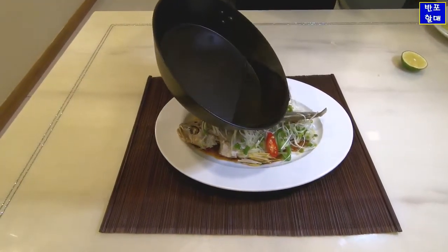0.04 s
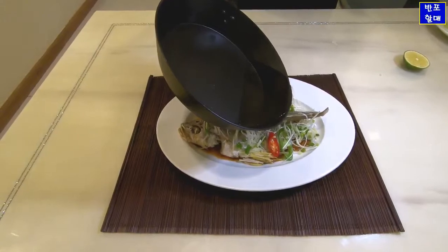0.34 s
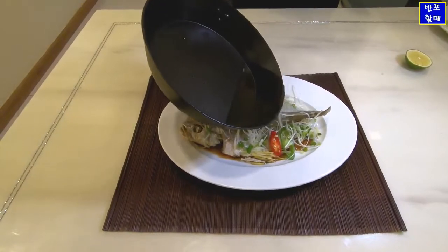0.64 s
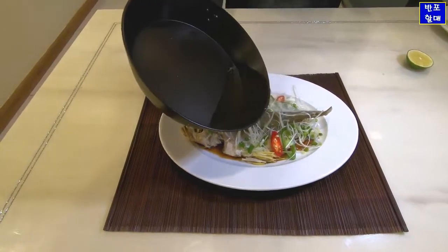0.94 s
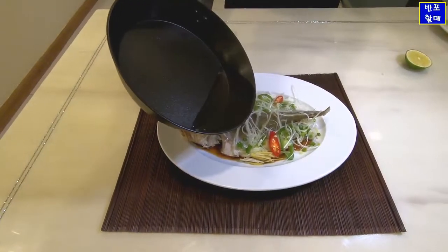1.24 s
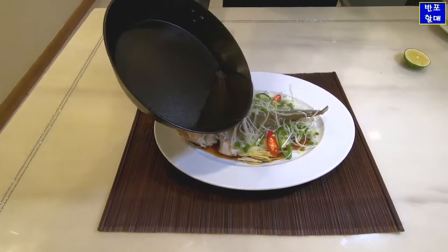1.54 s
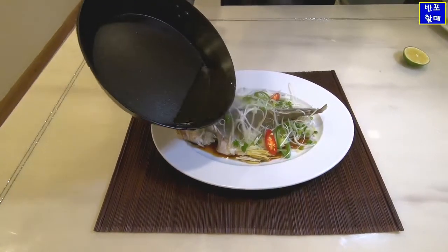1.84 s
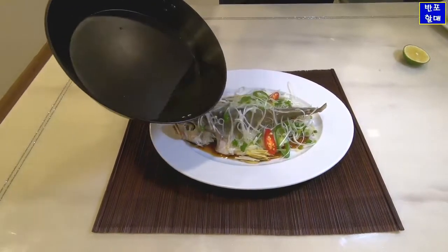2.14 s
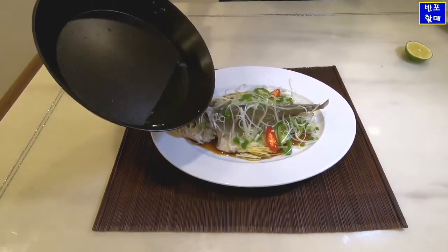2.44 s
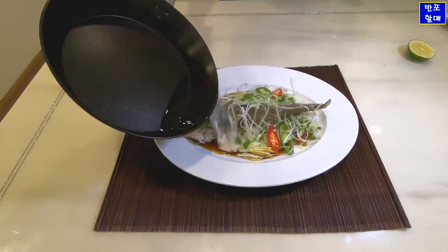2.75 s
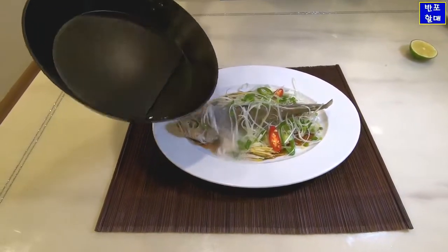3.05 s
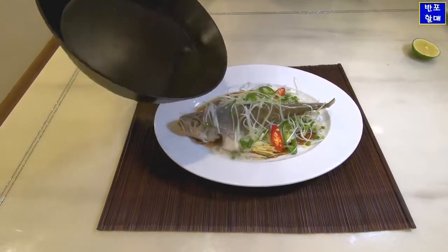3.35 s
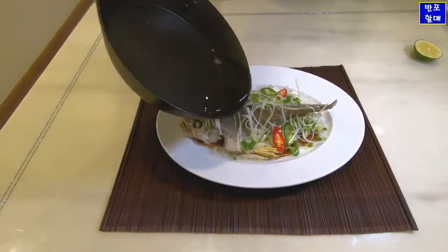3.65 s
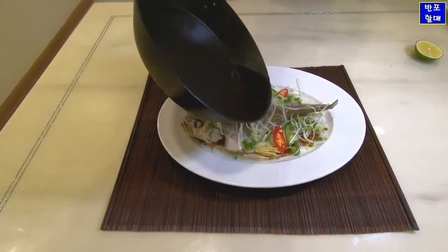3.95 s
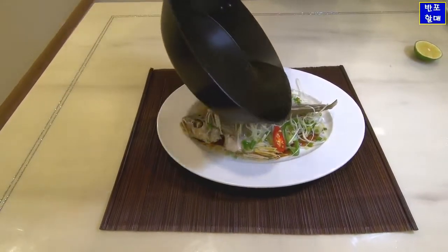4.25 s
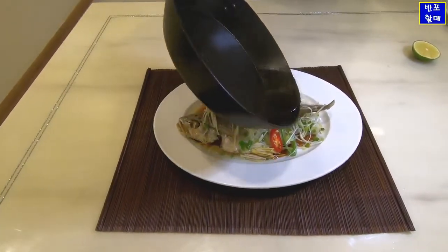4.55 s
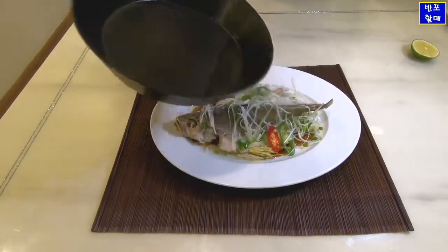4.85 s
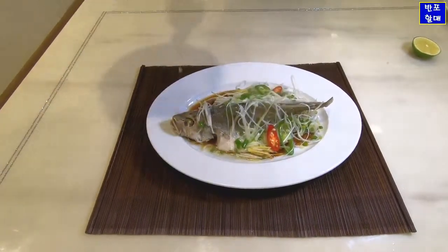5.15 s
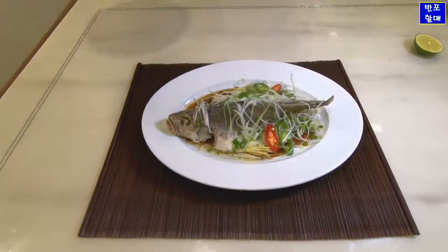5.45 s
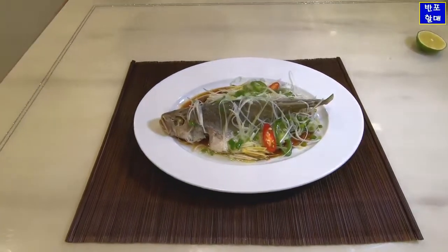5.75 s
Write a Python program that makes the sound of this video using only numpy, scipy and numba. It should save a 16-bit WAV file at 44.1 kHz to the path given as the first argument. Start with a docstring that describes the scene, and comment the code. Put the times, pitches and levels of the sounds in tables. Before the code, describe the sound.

Hot oil is poured from a pan over steamed fish and onion on a plate. A bright, fizzing sizzle surges in several gushes, each thinning to a crackle, while single drops spit with sharp pops. It drops away briefly midway, surges again, then dies down to scattered ticks. The microphone is close, in a small kitchen with a faint low hum.

```python
"""A bright sizzle surges in gushes, sputtering and spitting: hot oil poured over steamed fish and onion.
Water flashes to steam under the oil: thousands of tiny bubbles burst each second, some in quick runs,
and single drops spit loudly. The plate rings a little and the pan above it throws the sound back.
Behind it are a small kitchen, a low swelling hum and a soft rush as the pan is taken away.
The microphone is close, and its limiter ducks after the loudest spits."""
import sys
import numpy as np
from scipy import signal
from scipy.fft import rfft, irfft, next_fast_len
from scipy.io import wavfile
from numba import njit

SR = 44100
rng = np.random.default_rng(int(sys.argv[2]) if len(sys.argv) > 2 else 0)


def int16_out(signal):
    """Quantize to a 16-bit WAV file."""
    q = np.round(np.clip(np.atleast_2d(signal).T, -1, 1) * 32767)
    wavfile.write(sys.argv[1], SR, q.astype(np.int16))


N = 260454
TIME = np.arange(N) / SR
POP_TIME = np.arange(-128, 896) / SR  # from just before a pop's peak to just after [s]


def boil(soak_db=-9.5, soak_s=.081, flash_db=1, flash_s=.04,
         thinning_s=.14, crackle_per_s=310, sag_octaves_per_s=.32):
    """Gushes swell, hold and fade. Gives strength, coarse bubbling and fizz in dB, bubble pitch and rate."""
    # gushes of oil: (start [s], rise [s], hold [s], level [dB], fade [dB/s], coarse bubbling [dB],
    # fine fizz [dB], bubble pitch [Hz], rate of 3 kHz bubbles [1/s])
    gushes = [(0.26, 0.037, 0.091, -33, 37, 4.5, 5.5, 4100, 2110),
              (0.40, .14, 0.23, -24, 28, 1.5, 2, 4230, 1800),
              (1.05, 0.23, 0.21, -31.5, 23, 2.5, 8.5, 3700, 527),
              (1.616, 0.086, .13, -23.5, 40, 0.5, 2.5, 3700, 520),
              (1.985, 0.083, 0.093, -36, 30, -1.5, 0.5, 2460, 384),
              (2.429, 0.023, 0.065, -44, 43, 7, 11.5, 4210, 640),
              (2.73, 0.068, .10, -21.5, 46, -1, 1.5, 3898, 1900),
              (2.94, 0.087, .07, -28, 36, 1.5, 3, 3372, 725),
              (3.353, 0.036, 0.32, -40, 27, -1, 6, 4242, 405),
              (3.779, 0.036, 0.057, -32, 30, 9.5, 7, 2950, 1020),
              (3.858, .11, 0.11, -23, 42, -2, 0, 2937, 1540), (4.249, .21, 0.25, -27, 27, 3, 0, 3350, 1990),
              (4.66, 0.17, 0.14, -29.5, 33.5, 1, 6.5, 3446, 820)]
    # the oil simmers faintly in the pan all along
    simmer_db, simmer_coarse_db, simmer_hz, simmer_per_s = -63.5, -12, 3600, 25
    simmer = np.array([1, undb(2 * simmer_coarse_db), 1, simmer_hz, simmer_per_s])
    total = undb(2 * simmer_db) * simmer[:, None]
    for start, rise, hold, db, fade, coarse_db, fizz_db, hz, per_s in gushes:
        age = np.maximum(TIME - start, 0)
        cooling = np.maximum(age - rise - hold, 0)
        swell = np.sin(np.pi / 2 * np.minimum(age / rise, 1))
        power = (swell * undb(db - fade * cooling)) ** 2
        # the first touch flashes into fizz; coarse bubbling builds as oil sinks into the sauce
        fizz = undb(fizz_db + flash_db * np.exp(-age / flash_s)) ** 2
        coarse = undb(coarse_db + soak_db * np.exp(-age / soak_s)) ** 2
        # as the oil cools, the boil drops in pitch and thins to a crackle
        pitch = hz * 2 ** (-sag_octaves_per_s * age)
        rate = crackle_per_s + (per_s - crackle_per_s) * np.exp(-cooling / thinning_s)
        total = total + np.array([power, power * coarse, power * fizz, power * pitch, power * rate])
    levels_db = 10 * np.log10(total[:3])
    pitch, rate = total[3:] / total[0]  # the strongest gush dominates
    return (*levels_db, pitch, rate)


def sizzle(state, favour_db=8, usual_hz=3300, flutter_db=1.0):
    """Bubbles of all sizes burst: wet sauce makes coarse ones, fresh oil fine ones."""
    # tone of the sizzle: (frequency [Hz], relative level [dB])
    tone = [(100, -3), (160, -13.5), (220, -8.5), (330, -13.5), (500, -8), (850, -11.5), (1300, -8),
            (1950, -2), (2700, 1.5), (4700, -3.5), (7200, -7.5), (9400, -11), (11000, -15.5), (13500, -21),
            (15500, -34)]
    strength, coarse, fizz, pitch, rate = state
    rate = np.maximum(rate, 20)
    flutter = flutter_db * walk(45)
    out, power = 0, 0
    for hz in np.geomspace(150, 14500, num=18):
        low = np.clip(np.log2(2300 / hz) / .16, 0, 1)
        high = np.clip(np.log2(hz / 4300), 0, 1)
        db = strength + low * (coarse - strength) + high * (fizz - strength) + flutter
        # each gush meets other food and favours another bubble size
        db = db + favour_db * (hump(hz, pitch, octaves=.63) - hump(hz, usual_hz, octaves=.65))
        per_s = rate * (hz / 3000) ** .3  # small bubbles are more numerous
        grains = bubbles(hz, per_s, cycles=1.33, scatter_db=.5, spread_s=.000024)
        out = out + np.sqrt(hz) * undb(db) * grains
        power = power + hz * undb(2 * spectrum_db(tone, hz))
    return colour(out, tone) / np.sqrt(power)


def bubbles(hz, rate, cycles, scatter_db, spread_s):
    """Bubbles of one size burst at random, each at its own place on the plate."""
    at = np.flatnonzero(rng.random(N) < rate / SR)
    gain = undb(scatter_db * np.minimum(rng.exponential(size=len(at)), 5))
    gain = gain * rng.choice([-1, 1], len(at)) / np.sqrt(rate[at])
    lag = np.rint(spread_s * SR * rng.standard_normal(len(at))).astype(int)  # between left and right
    clicks = [np.bincount(np.clip(at + shift, 0, N - 1), gain, N) for shift in (lag // 2, lag // 2 - lag)]
    return unit(np.array([ring(channel, burst(hz, cycles)) for channel in clicks]))


def burst(hz, cycles):
    """A bursting bubble: a few pressure swings that swell at once and die away."""
    t = np.arange(2048) / SR
    age = t * hz / (.5 * cycles)
    phase = np.pi - 2 * np.arctan(np.pi * cycles)
    return age * np.exp(1 - age) * np.sin(2 * np.pi * hz * t + phase)


def spits(level_db=-1.15, splash_db=-18, splash_s=.0036, splash_hz=6000,
          thud_db=-23, crack_db=-17, crack_hz=8000):
    """A trapped drop explodes: a sharp crack, a round pop, a thud in the food and a brief splash."""
    # the loudest spitting drops: (time [s], relative level [dB], pitch [Hz], decay [cycles])
    drops = [(.058, -31.5, 3850, 0.53), (.089, -38, 4200, .6), (0.2844, -16, 4900, 0.83),
             (0.3268, -23.5, 1090, 0.33), (.6274, -11, 2800, .9), (.7022, -14, 3340, 0.78),
             (.7284, -9.5, 2433, 0.83), (0.7445, -9.5, 2260, 0.44), (.7866, -4.5, 3815, 1.3),
             (0.7931, -6, 2940, 1), (.8812, -9, 4207, 1.1), (.9345, -13, 3200, 0.59),
             (.9925, -14.5, 2310, 0.89), (1.008, -16, 3360, 0.82), (1.0526, -11.5, 3798, 1.3),
             (1.1453, -12.5, 3606, 0.97), (1.2169, -8.5, 1920, 0.73), (1.2825, -7.5, 3290, 1.1),
             (1.3022, -5.5, 3000, 0.59), (1.3321, -9, 2810, 0.56), (1.3359, -6.5, 5247, 0.72),
             (1.3806, -8.5, 3850, 1.6), (1.4071, -2, 4550, 0.69), (1.4431, -13.5, 2880, .7),
             (1.4928, -22, 4415, .7), (1.5816, -13, 4520, 0.67), (1.6317, -4, 3060, 0.83),
             (1.6704, -8, 4347, 1.73), (1.7355, -4.5, 4408, 0.79), (1.7455, -6, 4186, 0.79),
             (1.7597, -5.5, 4064, 1.3), (1.7793, -11, 4000, 0.86), (1.8177, -5, 3640, 0.9),
             (1.8588, -11, 3162, 1.1), (1.8746, -16, 4600, 0.71), (1.8789, -6.5, 4370, 0.64),
             (1.9197, -2.5, 3200, 1.18), (1.9454, -19, 3774, .7), (1.9608, -8, 3554, 1.6),
             (1.9852, -8.5, 2900, 1.6), (1.9884, -5.5, 3540, 1.4), (2.0185, -4.5, 2660, 1.1),
             (2.0273, -11, 3090, 1), (2.0727, -11, 3940, 0.65), (2.0885, -9, 3396, 1.2),
             (2.1074, -6, 2620, 0.85), (2.1654, -10, 3970, 0.57), (2.2326, -25, 3504, 0.81),
             (2.29, -24, 3190, .8), (2.3028, -24, 3395, 0.62), (2.3408, -23.5, 3380, 0.59),
             (2.7451, -26, 4520, 1.3), (2.8545, -5, 3798, 0.96), (2.8917, -3.5, 3640, 1),
             (2.9098, -4.5, 4506, 2.4), (2.958, -7, 3280, 1.3), (2.964, -7, 3530, 1.47),
             (2.9685, -5.5, 3400, 1.3), (2.983, -8, 3070, 1.8), (3.0318, -9, 3664, 0.52),
             (3.0944, -8.5, 3268, 0.59), (3.1407, -6, 3298, 1.7), (3.1725, -3.5, 3696, 1.7),
             (3.219, -14, 3798, 1.47), (3.2278, -9.5, 4120, 0.98), (3.2484, -9.5, 3100, 0.5),
             (3.2685, -11.5, 3296, 0.63), (3.3205, -19.5, 3576, 0.79), (3.3851, -15, 3600, 0.82),
             (3.5019, -11, 3904, 0.87), (3.5183, -14, 3180, 0.75), (3.5262, -13.5, 4300, 0.9),
             (3.6757, -13, 4180, 5.5), (3.685, -20.5, 3283, 4), (3.6946, -23, 4214, 2.2),
             (3.8498, -3.5, 2642, 0.77), (3.9188, -7.5, 2196, 0.69), (4.052, -13, 2712, 1.04),
             (4.065, -6, 2512, 0.82), (4.077, -11, 2384, 0.96), (4.1094, -1.5, 2496, 0.55),
             (4.1661, -6.5, 2898, 1.34), (4.186, -9, 2711, 1.65), (4.1991, -6, 2498, 1.1),
             (4.2259, -5.5, 3252, 0.95), (4.2295, -1.5, 2591, 0.97), (4.2803, -12.5, 2993, 1),
             (4.3441, -4, 3406, 0.59), (4.4036, -10.5, 3292, 0.82), (4.4563, -6.5, 4125, 0.76),
             (4.7156, -6, 2700, 0.75), (4.7268, -6.5, 1920, 0.81), (4.7659, -5.5, 2716, 0.56),
             (4.7826, -8, 2180, 1.05), (4.8367, -9, 2350, 0.63), (4.8527, -5.5, 3686, 0.57),
             (5.0017, -11, 2871, 0.79), (5.017, -15.5, 3462, 1.03), (5.0846, -18, 2903, 0.49),
             (5.116, -13.5, 2614, 0.59), (5.169, -31, 3843, 0.58), (5.2086, -8.5, 3022, 0.39),
             (5.211, -14.5, 1221, 0.51), (5.236, -23, 1289, 0.48), (5.2922, -15.5, 2388, 0.84),
             (5.392, -17, 3008, 0.73), (5.4422, -17.5, 3857, 0.59), (5.5181, -15.5, 3910, 0.67),
             (5.795, -17, 3270, 0.41)]
    out = np.zeros(N)
    dull = signal.butter(2, splash_hz, fs=SR, output="sos")
    spray = undb(splash_db) * (POP_TIME > 0) * np.exp(-np.abs(POP_TIME) / splash_s)
    crack = undb(crack_db) * pop(crack_hz, cycles=.36)
    for s, db, hz, cycles in drops:
        splash = signal.sosfilt(dull, spray * rng.standard_normal(len(spray)))
        thud = undb(thud_db) * pop(hz / 4, cycles=.3)
        add(out, s, undb(db + level_db) * (crack + pop(hz, cycles) + splash + thud))
    return out


def sputter(state, above_db=6, scatter_db=2.5, ceiling_db=-17.5, low_hz=2900, high_hz=11000,
            gap_s=.0032, tilt_db_per_octave=-6, runs=340, pops_per_run=4):
    """One bursting bubble sets off its neighbours: short, uneven runs of crackles, each at its own spot."""
    strength, _, fizz, _, _ = state
    out = np.zeros((2, N))
    for when, loudness, place, *draws in rng.random((runs, 3 + 3 * pops_per_run)):
        at = int(when * (N - 1))
        db = (strength[at] + fizz[at]) / 2 + above_db - scatter_db * np.log(1 - loudness)
        balance = np.sqrt(2 * np.array([[.25 + place / 2], [.75 - place / 2]]))
        s = at / SR
        for wait, pitch, share in np.reshape(draws, (pops_per_run, 3)):
            s = s - gap_s * np.log(1 - wait)
            hz = low_hz * (high_hz / low_hz) ** pitch
            gain = undb(min(db, ceiling_db) + tilt_db_per_octave * np.log2(hz / low_hz)) * (.5 + share)
            add(out, s, balance * gain * pop(hz, cycles=1.38))
    return out


def snaps(level_db=-1):
    """The smallest droplets flash to steam with a thin, high snap."""
    # tiny droplets: (time [s], relative level [dB], pitch [Hz], decay [cycles])
    droplets = [(.2859, -15, 7060, 4), (.8658, -16, 9990, 1.24), (0.9043, -7, 10400, 1.4),
                (1.0522, -14, 8900, 3), (1.063, -14, 8000, 3), (1.4068, -5.5, 9700, 1.6),
                (1.417, -9, 7540, 3), (1.582, -21.5, 9600, 1.2), (1.8095, -7, 9000, 1),
                (1.8155, -8, 9600, 0.95), (1.8746, -8, 9000, 1), (1.879, -13, 8000, 1.5),
                (1.9558, -18, 7500, 2), (1.9606, -12, 7500, 2), (2.0889, -21, 9494, .8),
                (2.1657, -15, 8000, 1.3), (2.3413, -25, 7500, 2), (2.3727, -21.5, 7500, 5.9),
                (2.7695, -29, 6907, 2.91), (2.8856, -6, 9900, 1.35), (2.9554, -9, 9600, 1.4),
                (3.0317, -10, 10480, 2.2), (3.052, -15.5, 10000, 2), (3.2278, -17, 8000, 2),
                (3.393, -20, 7976, 1.93), (3.4723, -24, 8000, 2.2), (3.5263, -16, 10030, 1.2),
                (4.1999, -13, 10010, 1.2), (4.2267, -15, 9980, 0.76), (4.8295, -13, 9490, 1.19),
                (5.0844, -13, 7205, 2.63), (5.1154, -20, 9486, 1.03), (5.4138, -26, 9050, 1.2),
                (5.4426, -23, 8020, 2.1), (5.518, -25, 7900, 1.96), (5.795, -29, 8020, 1.9)]
    out = np.zeros(N)
    for s, db, hz, cycles in droplets:
        add(out, s, undb(db + level_db) * pop(hz, cycles))
    return out


def pop(hz, cycles, swell_cycles=.17):
    """A drop's pressure swings: they build within a cycle, peak near time 0 and die away."""
    turns = hz * POP_TIME
    envelope = np.exp(-np.logaddexp(-turns / swell_cycles, turns / cycles))
    return envelope / envelope.max() * np.cos(2 * np.pi * turns)


def dish(x, direct_db=-2, hollow_loss=.093, echo_s=.0038, echo_db=-15):
    """The plate rings a little; the pan above it forms a hollow and throws the sound back."""
    # resonances of the plate and its food: (frequency [Hz], width [Hz], gain [dB])
    plate_modes = [(540, 91, -38), (912, 10, 4.5), (1184, 120, -2), (1586, 190, -1), (3390, 2920, -10),
                   (4800, 370, -12), (9200, 650, -3)]
    # resonances of the hollow under the pan: (frequency [Hz], width [Hz], gain [dB])
    hollow_modes = [(2403, 166, -0.5), (2834, 57, -1), (4040, 160, -14), (4380, 270, -5)]
    # bands that the pan's reflection cancels: (frequency [Hz], width [Hz], cancelling gain [dB])
    hollow_dips = [(1760, 290, -11.5), (3180, 210, -12.5), (5600, 330, -26)]
    # how closely the pan covers the boil and how its tilt retunes the hollow:
    # (time [s], cover [dB], tuning [ratio])
    pan_moves = [(0.3, 0, 1.03), (.6, 2.5, 1.006), (.8, -5, 0.97), (1.2, 1.5, 1.04), (1.8, -0.5, 0.98),
                 (2.3, -22, 0.95), (2.8, -14, 1.22), (3.5, -14, 1.053), (3.82, 1.5, 1.017),
                 (4.05, -7, 1.006), (4.35, -1, 1.07), (4.8, -23, 1.023), (5.2, -29.5, 0.76)]
    cover_db, tuning = curves(pan_moves)
    cover = undb(cover_db)
    plate = undb(direct_db) * x + resonate(x, plate_modes)
    hollow = resonate(x, hollow_modes, tuning) - resonate(x, hollow_dips, tuning)
    dulled = signal.sosfilt(signal.butter(1, 2500, fs=SR, output="sos"), x)
    echo = np.pad(dulled, ((0, 0), (int(echo_s * SR), 0)))[:, :N]
    return (plate + cover * hollow) / (1 + hollow_loss * cover) + undb(echo_db) * echo


def room(x, early_db=-13, early_t60=.088, late_db=-13, late_t60=.71, spots=3):
    """Quick dull reflections off the table, then the kitchen's short tail, different left and right."""
    # reflections favour the low middle and the treble: (frequency [Hz], gain [dB])
    tone = [(200, -1), (700, 5), (1300, 6), (2500, -2), (4500, 4), (8000, 9), (14000, 0)]
    dull = signal.butter(1, [500, 1800], "band", fs=SR, output="sos")
    # the boil hops between spots on the plate, each with its own reflections
    shares = np.array([walk(70) for _ in range(spots)])
    shares = shares / np.linalg.norm(shares, axis=0)
    out = np.zeros((2, N))
    for channel in range(2):
        for share in shares:
            early = undb(early_db) * signal.sosfilt(dull, tail(early_t60))
            late = undb(late_db) * tail(late_t60)
            out[channel] += ring(x[channel] * share, early + late)
    return colour(out, tone)


def tail(t60):
    """A scatter of reflections that falls 60 dB per t60 seconds; energy 1."""
    t = np.arange(SR // 3) / SR
    response = rng.standard_normal(len(t)) * undb(-60 * t / t60) * (t > .0005)
    return response / np.linalg.norm(response)


def rush():
    """A soft midrange rush as the pan is taken away."""
    # swell of the rush: (time [s], level [dB])
    swell = [(5.6, -64), (5.66, -44), (5.72, -41), (5.77, -41), (5.82, -45), (5.88, -50)]
    # tone of the rush: (frequency [Hz], relative level [dB])
    tone = [(100, -6), (500, -3.5), (1500, 0), (2700, 3), (4000, -4), (10000, -16), (14000, -42)]
    db, = curves(swell)
    gate = TIME > swell[0][0]
    return gate * undb(db) * stereo_noise(tone, side_db=-8)


def hum(hz=39.8, wander_hz=1.54, rumble_db=-16, waver_db=2.5):
    """A very low hum swells and wavers, and a soft rumble swells with it."""
    # swells of the hum: (time [s], level [dB])
    swells = [(0.0, -40), (.2, -40), (0.4, -33.5), (.65, -38), (0.79, -53), (1.1, -50.5), (1.73, -38),
              (2.28, -56), (2.5, -39), (2.68, -69), (2.81, -64), (2.94, -71), (3.45, -57.5), (3.79, -39.5),
              (4.3, -51), (4.47, -40), (4.88, -52), (5.32, -47), (5.39, -67), (5.44, -41.5), (5.56, -35.5),
              (5.63, -52), (5.7, -38), (5.8, -35), (5.86, -56)]
    # tone of the rumble: (frequency [Hz], relative level [dB])
    tone = [(20, -33), (60, -6), (140, -3.5), (250, -14.5), (600, -50), (3000, -90)]
    db = curves(swells)[0] + waver_db * walk(16)
    phase = 2 * np.pi * np.cumsum(hz + wander_hz * walk(22)) / SR
    rumble = unit(colour(rng.standard_normal(N), tone))
    return undb(db) * (np.sqrt(2) * np.sin(phase) + undb(rumble_db) * rumble)


def kitchen(level_db=-50):
    """Steady rumble of the kitchen, nearly alike left and right."""
    # room tone: (frequency [Hz], relative level [dB])
    tone = [(20, -0.5), (30, -17), (55, 4.5), (100, -8), (160, -4.5), (250, -14.5), (440, -20.5),
            (660, -18.5), (1000, -23.5), (2000, -30), (3500, -26.5), (9000, -32), (14000, -43)]
    return undb(level_db) * stereo_noise(tone, side_db=-10)


def limiter(x, threshold_db=-7.5, slope=.86, recovery_db_per_s=40, attack_s=.0027):
    """A loud spit slips through and pushes the gain down; it then creeps back."""
    peak_db = 20 * np.log10(np.abs(x).max(axis=0) + 1e-9)
    over = slope * np.maximum(peak_db - threshold_db, 0)
    recovery = recovery_db_per_s * TIME
    cut_db = np.maximum.accumulate(over + recovery) - recovery
    pole = np.exp(-1 / (attack_s * SR))
    return x * undb(-signal.lfilter([1 - pole], [1, -pole], cut_db))


def undb(db):
    """Decibels to gain."""
    return np.exp(np.asarray(db) * (np.log(10) / 20))


def unit(x):
    """Scale to rms 1."""
    return x / np.sqrt(np.mean(x ** 2))


def curves(table):
    """Each column of a table, joined by straight lines in time."""
    s, *columns = np.transpose(table)
    return [np.interp(TIME, s, column) for column in columns]


def walk(rate):
    """Smooth random wander with a spread near 1."""
    steps = rng.standard_normal(int(N / SR * rate) + 2)
    return np.interp(TIME * rate, np.arange(len(steps)), steps)


def hump(hz, centre_hz, octaves):
    """Bell curve on a pitch axis, 1 at the centre."""
    return np.exp(-.5 * (np.log2(hz / centre_hz) / octaves) ** 2)


def spectrum_db(points, hz):
    """Read (frequency [Hz], level [dB]) points on a log-frequency axis."""
    point_hz, db = np.transpose(points)
    return np.interp(np.log(hz + 1), np.log(point_hz), db)


def colour(x, points):
    """Equalise along a smooth (frequency [Hz], gain [dB]) curve."""
    size = next_fast_len(N + 2048, real=True)
    gain = undb(spectrum_db(points, np.fft.rfftfreq(size, 1 / SR)))
    return irfft(rfft(x, size) * gain, size)[..., :N]


def stereo_noise(tone, side_db):
    """Coloured noise whose side level sets its width."""
    mid, side = unit(colour(rng.standard_normal((2, N)), tone))
    return mid + undb(side_db) * side * np.array([[1], [-1]])


def ring(x, response):
    """Play x through an impulse response."""
    return signal.oaconvolve(x, response)[:N]


def resonate(x, modes, tuning=1):
    """What a set of resonances adds to x; tuning shifts them all."""
    shift = tuning * np.ones(N)
    return sum(undb(db) * np.array([bandpass(channel, hz * shift, float(width)) for channel in x])
               for hz, width, db in modes)


@njit
def bandpass(x, hz, width):
    """One resonance whose centre may move; gain 1 at the centre."""
    out, band_state, low_state = np.empty(len(x)), 0., 0.
    for i in range(len(x)):
        step, damping = np.tan(np.pi * hz[i] / SR), width / hz[i]
        band = (band_state + step * (x[i] + 1e-18 - low_state)) / (1 + step * (step + damping))
        band_state = 2 * band - band_state
        low_state += 2 * step * band
        out[i] = damping * band
    return out


def add(track, s, sound):
    """Mix a pop into the track, its peak at s seconds."""
    i = int((s + POP_TIME[0]) * SR)
    if 0 <= i < N - len(POP_TIME):
        track[..., i:i + len(POP_TIME)] += sound


def scene():
    """Sizzle, sputter and spits on the plate, in the kitchen."""
    state = boil()
    oil = dish(sizzle(state) + sputter(state) + spits() + snaps())
    return oil + room(oil) + rush() + hum() + kitchen()


def record(dry, top_hz=15500):
    """Each microphone port has its own colour; a limiter ducks after loud spits; the top is cut."""
    # balance of the two ports: (frequency [Hz], left minus right [dB])
    balance = [(400, -0.5), (700, 0.5), (1300, -2), (2400, -0.5), (3500, -1), (4800, 2.5), (6500, -3.5),
               (8000, 2), (9400, -4), (12000, 0)]
    left = colour(dry[0], [(hz, db / 2) for hz, db in balance])
    right = colour(dry[1], [(hz, -db / 2) for hz, db in balance])
    limited = np.clip(limiter(np.array([left, right])), -1, 1)
    return signal.sosfilt(signal.ellip(8, .2, 70, top_hz, fs=SR, output="sos"), limited)


dry = scene()
out = record(dry)
int16_out(out)
```